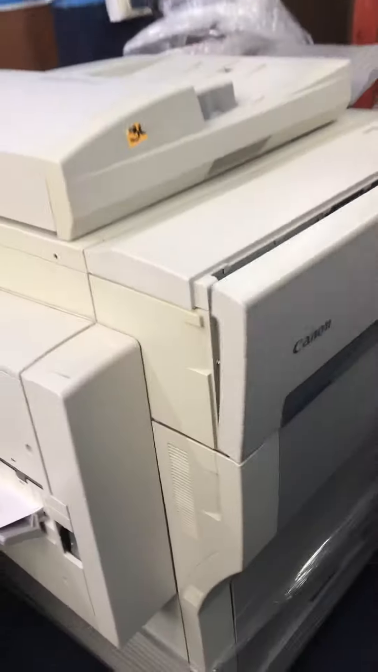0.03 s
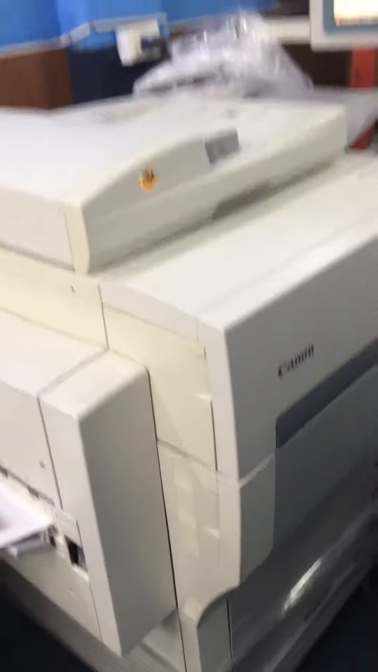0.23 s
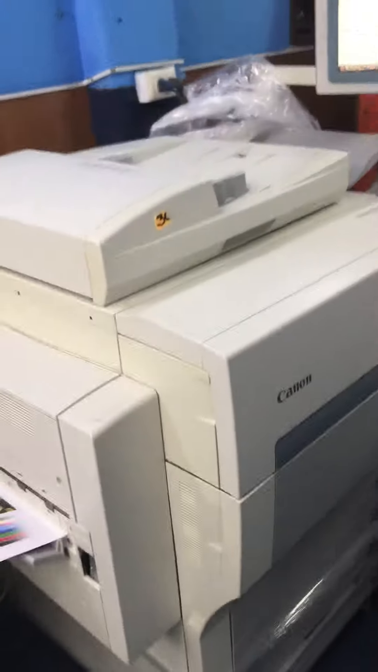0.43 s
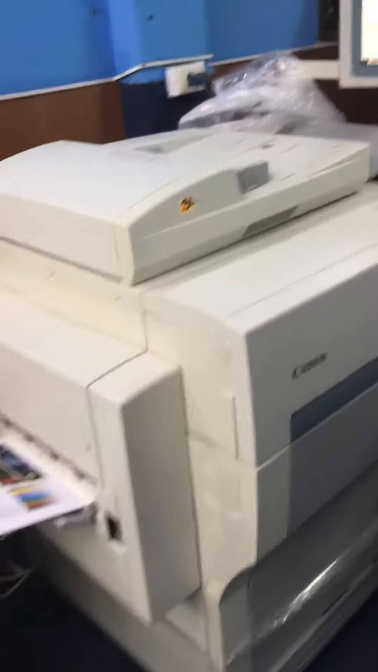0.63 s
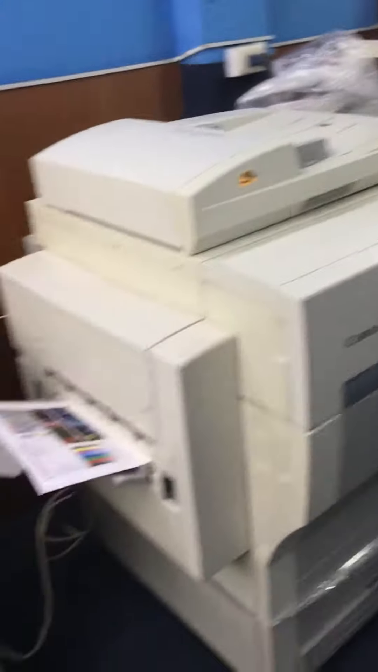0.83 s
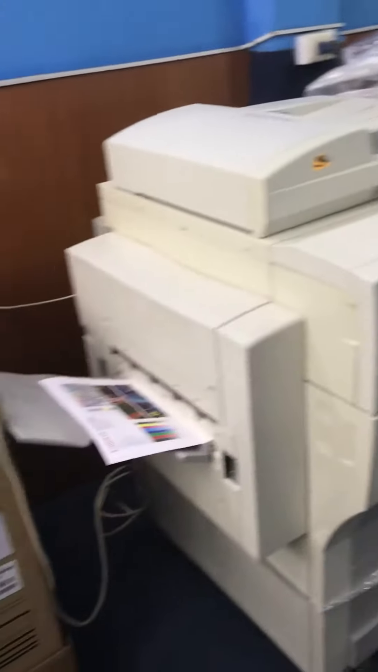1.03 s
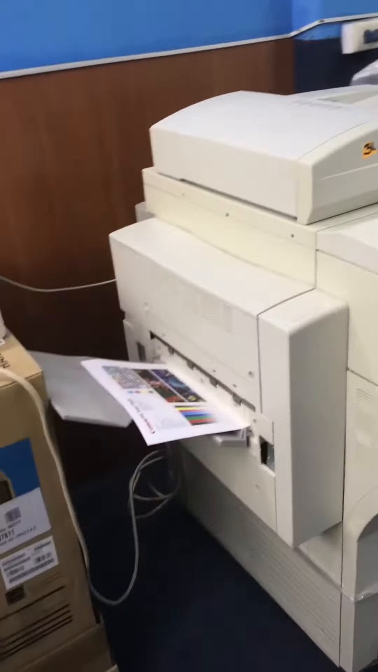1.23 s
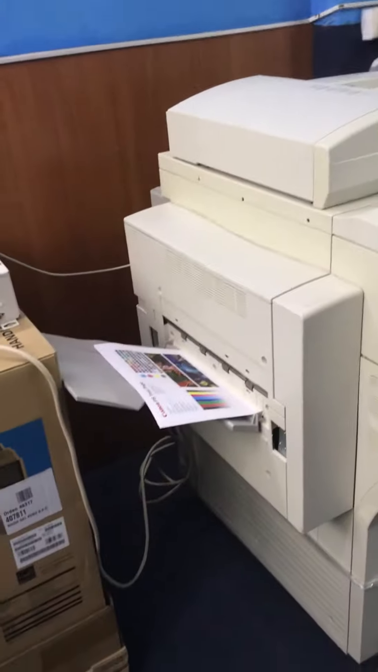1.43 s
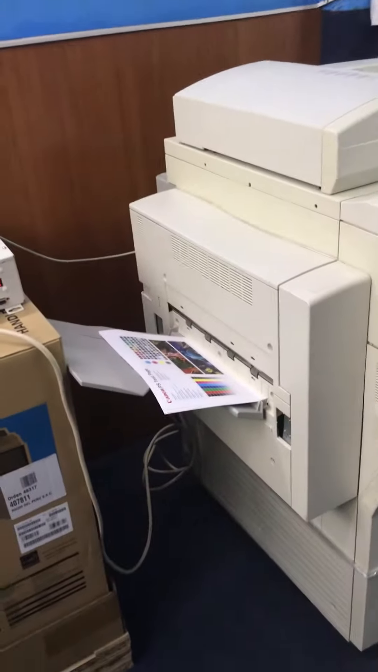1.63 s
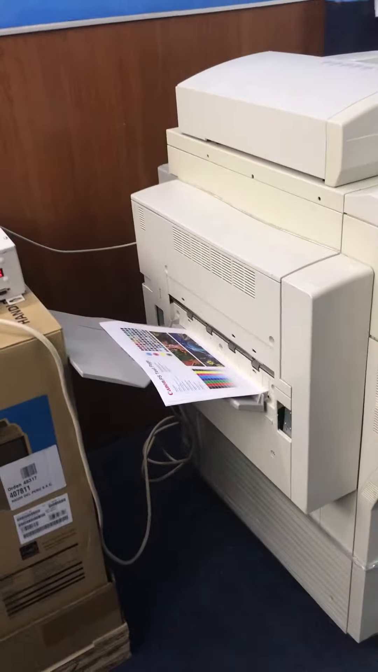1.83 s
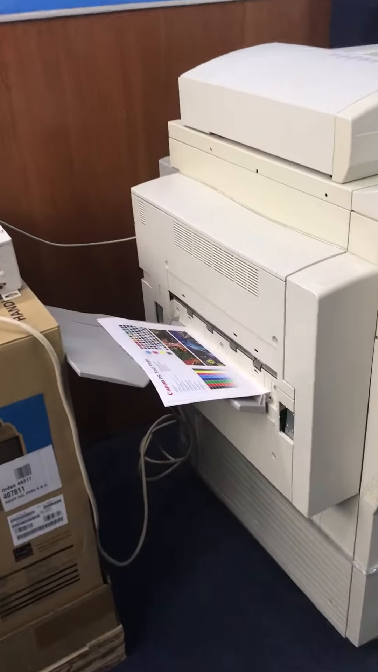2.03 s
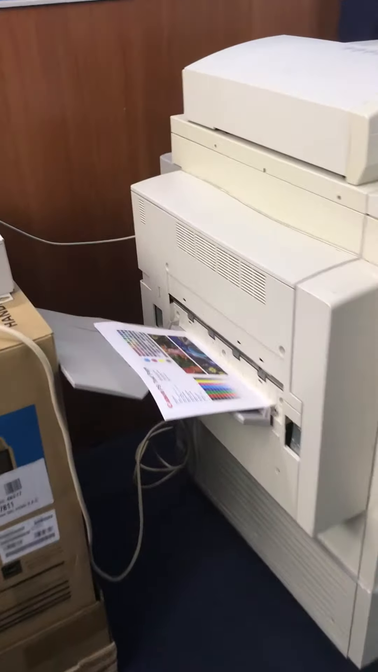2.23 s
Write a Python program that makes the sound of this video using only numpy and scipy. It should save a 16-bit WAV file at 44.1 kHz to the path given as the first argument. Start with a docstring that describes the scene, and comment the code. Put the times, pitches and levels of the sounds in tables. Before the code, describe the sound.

A large office printer runs throughout, a step or two from a handheld phone in a small room: soft fan and roller hiss, wavering low hum, thin steady motor whines shifting slightly around 0.9 s. A dull knock opens; at 0.25 s a hard double-edged latch clack hits the plastic cabinet with a short boom. Soft knocks and crisp clicks follow at 0.87-1.1 s, light ticks at 1.82 s.

```python
"""A small room, where a large office printer runs a step or two from a hand-held phone.
Fans and rollers hiss as shaped noise; a low hum wavers; motors and gears whine as steady sines.
A latch clacks hard into the plastic cabinet: noise bursts and pushes excite decaying modes.
Small parts tick, knock and ping as a sheet feeds out: short bursts through narrow resonances."""
import sys
import numpy as np
from scipy import signal
from scipy.fft import rfft, irfft
from scipy.io import wavfile
from scipy.ndimage import uniform_filter1d

SR = 44100
rng = np.random.default_rng(int(sys.argv[2]) if len(sys.argv) > 2 else 0)


def makeup_ratio(level_db):
    """Linear amplitude ratio for a level in decibels (20 dB per factor of ten)."""
    decades = np.asarray(level_db, float) / 20
    return 10 ** decades


def wav_record(signal):
    """Record a signal, one row per channel, as 16-bit PCM in the file named by sys.argv[1]."""
    frames = np.transpose(np.atleast_2d(signal))
    bounded = np.clip(frames, -1, 1)
    # unit amplitude maps onto the largest positive 16-bit level
    quanta = np.round(bounded * 32767).astype(np.int16)
    wavfile.write(sys.argv[1], SR, quanta)


N = 101430  # samples, 2.3 s

# Spectral shape of the fan and roller noise. Each row: frequency in Hz, relative density in dB per Hz.
AIR_SPECTRUM = [(15, -40), (25, -6), (70, -4), (114, -2.5), (229, -11), (476, -13), (641, -7), (818, -9),
                (1560, -14), (2480, -22.5), (2690, -19.5), (3820, -23), (7510, -27), (8360, -26.5),
                (16000, -36)]
# Broad cabinet resonances in the steady noise. Each row: centre in Hz, width in Hz, rms level in dB.
CABINET_HUMPS = [(218, 49, -63.5), (570, 96, -67.5), (3150, 100, -64), (5464, 360, -63.5), (8300, 250, -67)]
# Course of the low-mid rumble. Each row: time in seconds, relative level in dB.
RUMBLE_COURSE = [(0.45, -55), (0.572, -53.5), (1.356, -58.5), (2.0, -47.5), (2.01, -54), (2.3, -53.5)]
# Course of the wavering hum. Each row: time in seconds, pitch in Hz, rms level in dB.
HUM_COURSE = [(0.0, 60.6, -43), (0.12, 59.8, -50.5), (0.22, 59.7, -51), (0.27, 63, -42.5),
              (0.44, 62.2, -55.5), (0.66, 64.7, -49), (0.75, 64.0, -60), (0.81, 63, -48), (0.86, 63, -63),
              (0.91, 63.8, -45.5), (1.03, 63.7, -56.5), (1.23, 62, -45), (1.45, 62.8, -49),
              (1.5, 63.5, -55.5), (1.69, 63.4, -45), (1.77, 63.2, -45.5), (1.86, 62.2, -61),
              (1.94, 61, -51), (2.18, 61.5, -53), (2.2, 62.4, -57), (2.26, 63.6, -55), (2.3, 62, -55)]
# Multiples of the mirror motor's base pitch. Each row: multiple, mean level in dB before the phone has
# moved round to the outlet, mean level in dB after.
WHINE_MULTIPLES = [(11, -72, -65.5), (13, -70, -70), (14, -74, -73), (15, -72, -83), (16, -74, -84),
                   (18, -71, -72), (19, -73, -72), (21, -76, -74), (23, -74, -79), (24, -76, -80)]
# Gear and fan lines. Each row: frequency in Hz, mean level in dB before the move, mean level in dB after.
GEAR_LINES = [(232.4, -60.5, -61), (317.7, -67, -64.5), (556, -67, -67), (757, -70, -68), (926, -80, -68),
              (1368, -76, -68), (1540, -65.5, -70), (2665, -72, -69), (2700, -69, -71), (2725, -72, -69),
              (3190, -68, -73), (5450, -73, -75), (5550, -72, -76), (5620, -69, -76), (7190, -74, -78),
              (7940, -73, -76), (8630, -73, -76)]
# Six strong lines. Each entry: frequency in Hz.
STRONG_LINES_HZ = [636, 2634, 3084, 3160, 4481, 5377]
# Strong lines as the phone drifts through the room. Each row: time in seconds, mean level in dB of each line.
STRONG_COURSE = [(0, -56, -63, -70, -69, -72, -69), (.2, -55, -63, -70, -68, -74, -67),
                 (.55, -60, -67, -68, -63, -69, -70), (.7, -59, -68, -71, -66, -73, -68),
                 (.8, -58, -69, -69, -68, -63, -61), (.93, -58, -73, -70, -68, -72, -67),
                 (1.15, -57, -68, -72, -72, -72, -70), (1.3, -56, -60, -68, -60, -70, -70),
                 (1.5, -56, -64, -67, -65, -74, -71), (1.7, -56, -67, -63, -62, -76, -70),
                 (1.9, -56, -70, -66, -65, -69, -73), (2.08, -61, -70, -57, -69, -71, -69),
                 (2.2, -61, -65, -68, -72, -62, -71), (2.3, -60, -65, -65, -72, -68, -72)]
# Light ticks of small parts. Each row: start in seconds, relative level in dB, decay constant in seconds,
# share of the low resonances from 0 to 1.
TICKS = [(.703, -59, .003, .05), (0.973, -48, 0.0064, 0.38), (0.978, -50.5, 0.0043, 0.94),
         (0.981, -43.5, 0.0047, 0.44), (0.989, -48.5, 0.01, 0.47), (1.012, -58.5, 0.024, 0.7),
         (1.822, -47, 0.0027, 0.14), (1.827, -48, .008, 0.07), (1.84, -57, .008, 0.14),
         (1.849, -60, .01, 0.15), (1.864, -62, 0.0049, 0.22), (2.05, -67, 0.0028, .05)]
# High and low resonances of the small parts. Each row: centre in Hz, width in Hz, relative level in dB.
TICK_HIGH_MODES = [(12350, 320, 4.5), (13300, 1010, -9), (8590, 800, -2.5), (12000, 20000, -10)]
TICK_LOW_MODES = [(4260, 580, 6), (2500, 400, -1), (3350, 700, -2.5), (5550, 920, -1.5), (6920, 400, 0)]
# Dull knocks in the paper path. Each row: start in seconds, relative level in dB, centre in Hz.
KNOCKS = [(.001, -30, 243), (.008, -38, 540), (0.8645, -44, 1250), (0.868, -43, 1600), (0.870, -43, 480),
          (0.8835, -43, 600), (0.8835, -40, 1620)]
# One tiny metal part ringing alone. Each row: start in seconds, relative level in dB.
PINGS = [(1.02, -66), (1.041, -63), (1.089, -54)]
# Blows of the latch. Each row: start in seconds, relative snap level in dB, relative cabinet level in dB.
BLOWS = [(0.2222, -62, -30), (0.245, -16.5, -25), (0.2471, -19, -19.5), (0.2496, -28, -29),
         (0.2541, -30, -9.5), (0.2583, -42, -18), (0.261, -37, -23), (0.272, -52, -23), (0.283, -48, -21),
         (.289, -48, -28.5), (0.309, -51, -24.5)]
# Modes of the latch metal, all equally short. Each row: frequency in Hz, relative level in dB.
LATCH_MODES = [(7410, 4), (4380, -4), (8750, -1), (9580, 0.5), (11800, -5), (13100, -3), (14600, 3)]
# Modes of the cabinet, the high ones dying sooner. Each row: frequency in Hz, relative level in dB.
CABINET_MODES = [(170, -1), (238, -6), (280, -7), (350, -8), (420, -6), (585, -1), (702, -2), (740, -5),
                 (785, 7), (952, -3), (1180, -3), (1290, -4), (1470, -6), (1800, -2), (2050, -5),
                 (2205, -5), (2600, -11), (3200, -9.5), (3510, -12), (4500, -10)]
# Reverberation of the room. Each row: frequency in Hz, time to fall by 60 dB in seconds.
ROOM_T60 = [(80, 0.19), (300, 0.56), (1000, 0.42), (3000, 0.46), (8000, 0.39), (15000, 0.19)]

AIR_DB, AIR_SWELL_DB, AIR_FLICKER_DB = -50, 2.55, 1.5  # rms level; spread shared by all bands, spread of each
WHINE_HZ, LINE_DRIFT = 448.1, .0004  # base pitch; relative spread of pitch
LINE_WANDER_DB, LINE_FLUTTER_DB = 1.8, 3.4  # slow and fast spread in level, before the share of each line
STEADY_BELOW_HZ, STRONG_UNREST = 1460, .6  # lines below are steadier; share of unrest in the strong lines
MOVE_S, MOVE_LENGTH_S = 0.94, 0.27  # middle and length of the phone's move
KNOCK_WIDTH_HZ, KNOCK_S = 420, .0013
PING_HZ, PING_WIDTH_HZ, PING_S = 12650, 230, 0.0026
SNAP_S, THUD_S, RISE_S = .0022, 0.0063, 0.00018  # time constants: fall of snap and thud, rise of all bursts
SNAP_HISS_DB, THUD_HISS_DB = 4.5, 4.5  # gains of the bursts heard directly
PUSH_DB, PUSH_S = 14, 0.000087  # gain and time constant of the push on the cabinet
LATCH_T60_S, CABINET_T60_S, CABINET_CYCLES = .012, .08, 30  # cabinet t60: the shorter of .08 s and 30 cycles
BOOM_S, BOOM_HZ, BOOM_DB, BOOM_RISE_S = .258, 75, -32.5, 0.011  # dB of the envelope's peak
HIT_LOW_HZ = 165
ROOM_DB, ROOM_GAP_S = -8, 0.0013  # tail gain; ramp at the start of the tail
MIC_LOW_HZ, MIC_TOP_HZ = 20, 16000


def level(x, db):
    """Normalization: the signal is scaled to a given rms level."""
    return x * makeup_ratio(db) / np.sqrt(np.mean(x ** 2))


def curve(rows, axis=1):
    """Linear interpolation in time of one table column."""
    rows = np.array(rows)
    return np.interp(np.arange(N) / SR, rows[:, 0], rows[:, axis])


def on_log(rows, hz):
    """Linear interpolation of a table over log frequency."""
    rows = np.array(rows, float)
    return np.interp(np.log(hz), np.log(rows[:, 0]), rows[:, 1])


def band(x, hz, width):
    """Simple resonator: a two-pole band-pass of unit gain at its centre."""
    return signal.lfilter(*signal.iirpeak(min(hz, .45 * SR), hz / width, fs=SR), x)


def walk(rate):
    """Slow random modulation: values held for 1 / rate seconds and smoothed twice, spread near 1."""
    hold = int(SR / rate)
    steps = np.repeat(rng.standard_normal(N // hold + 1), hold)
    return 1.143 * uniform_filter1d(uniform_filter1d(steps, hold), hold)[:N]


def ring(x, modes):
    """Modal superposition: x excites decaying modes, neighbours in opposite phase."""
    out = 0
    for k, (hz, db, t60) in enumerate(modes):
        radius = np.exp(-np.log(1000) / (t60 * SR))
        angle = 2 * np.pi * hz / SR
        numerator = [0, radius * np.sin(angle)]
        denominator = [1, -2 * radius * np.cos(angle), radius ** 2]
        out = out + (-1) ** k * makeup_ratio(db) * signal.lfilter(numerator, denominator, x + 1e-18)
    return out


def bursts(times, dbs, fall_s):
    """Impact noise: random pressure under a quick rise and an exponential fall."""
    envelope = np.full(N, 1e-18)
    np.add.at(envelope, (np.asarray(times) * SR).astype(int), makeup_ratio(dbs))
    for constant_s in (fall_s, RISE_S):
        envelope = signal.lfilter([1], [1, -np.exp(-1 / (constant_s * SR))], envelope)
    return envelope / (RISE_S * SR) * rng.standard_normal(N)


def air():
    """Broadband flow noise: half-octave bands swell together and flicker alone, plus humps and rumble."""
    f = np.fft.rfftfreq(N, 1 / SR)
    spectrum = rfft(rng.standard_normal(N)) * makeup_ratio(on_log(AIR_SPECTRUM, f + 1))
    swell = walk(0.5)
    hiss = 0
    for octave in np.arange(4, 14.5, .5):  # band centre as a power of two in Hz
        share = np.clip(1 - np.abs(np.log2(f + 1) - octave) / .5, 0, 1)
        gain_db = AIR_SWELL_DB * swell + AIR_FLICKER_DB * walk(13.87)
        hiss = hiss + irfft(spectrum * share, N) * makeup_ratio(gain_db)
    humps = sum(level(band(rng.standard_normal(N), hz, width), db) for hz, width, db in CABINET_HUMPS)
    low_mid = band(band(rng.standard_normal(N), 262, 300), 262, 300)
    rumble = level(low_mid, -4.5) * makeup_ratio(curve(RUMBLE_COURSE))
    return level(hiss, AIR_DB) + humps + rumble


def tone(hz, before_db, after_db, share=1):
    """Pure tone whose level shifts as the phone moves; high lines wander and flutter more."""
    moved = np.clip((np.arange(N) / SR - MOVE_S) / MOVE_LENGTH_S + .5, 0, 1)
    phase = 2 * np.pi * (np.cumsum(hz * np.ones(N)) / SR + rng.random())
    depth = share * min(np.mean(hz) / STEADY_BELOW_HZ, 1) ** .5
    unrest_db = depth * (LINE_WANDER_DB * walk(3.3) + LINE_FLUTTER_DB * walk(17))
    return np.sqrt(2) * np.sin(phase) * makeup_ratio(before_db + (after_db - before_db) * moved + unrest_db)


def drifting(hz, rate=3.55):
    """Frequency drift: a nominal pitch varies slowly and randomly."""
    return hz * (1 + LINE_DRIFT * walk(rate))


def motors():
    """Rotating machinery: hum, whine multiples of one shaft speed, separate gear lines and strong lines."""
    hum_phase = 2 * np.pi * np.cumsum(curve(HUM_COURSE)) / SR
    hum = np.sqrt(2) * np.sin(hum_phase) * makeup_ratio(curve(HUM_COURSE, axis=2))
    shaft = drifting(WHINE_HZ, 1.97)
    whine = sum(tone(multiple * shaft, before, after) for multiple, before, after in WHINE_MULTIPLES)
    gears = sum(tone(drifting(hz), before, after) for hz, before, after in GEAR_LINES)
    strong = sum(tone(drifting(hz), 0, 0, STRONG_UNREST) * makeup_ratio(curve(STRONG_COURSE, axis=k + 1))
                 for k, hz in enumerate(STRONG_LINES_HZ))
    return hum + whine + gears + strong


def ticks():
    """Impact on small parts: each burst is shared between high and low resonances."""
    high, low = 0, 0
    for start, db, fall_s, low_share in TICKS:
        shake = bursts([start], [db], fall_s)
        low_share = np.clip(low_share, 0, 1)
        high = high + shake * (1 - low_share)
        low = low + shake * low_share
    bright = sum(makeup_ratio(db + 12.5) * band(high, hz, width) for hz, width, db in TICK_HIGH_MODES)
    dark = sum(makeup_ratio(db + 14) * band(low, hz, width) for hz, width, db in TICK_LOW_MODES)
    return bright + dark


def knocks():
    """Damped resonance: short bursts pass two resonators in cascade, the second twice as wide."""
    out = 0
    for start, db, hz in KNOCKS:
        narrow = band(bursts([start], [db + 20.5], KNOCK_S), hz, KNOCK_WIDTH_HZ)
        out = out + band(narrow, hz, 2 * KNOCK_WIDTH_HZ)
    return out


def pings():
    """Selective resonance: short bursts make a tiny metal part ring on one high note."""
    start, db = np.array(PINGS).T
    narrow = band(bursts(start, db, PING_S), PING_HZ, PING_WIDTH_HZ)
    return makeup_ratio(21) * band(narrow, PING_HZ, 4 * PING_WIDTH_HZ)


def boom():
    """Whole-body oscillation: the cabinet booms once after the clack, swelling and dying away."""
    t = np.clip(np.arange(N) / SR - BOOM_S, 0, None)
    envelope = t / BOOM_RISE_S * np.exp(1 - t / BOOM_RISE_S)
    return makeup_ratio(BOOM_DB) * envelope * np.sin(2 * np.pi * BOOM_HZ * t)


def latch():
    """Impact excitation: each blow snaps the metal and pushes the cabinet; returns metal ring and crash."""
    start, snap_db, body_db = np.array(BLOWS).T
    snap = bursts(start, snap_db, SNAP_S)
    thud = bursts(start, body_db, THUD_S)
    push = np.full(N, 1e-18)
    push[(start * SR).astype(int)] = makeup_ratio(body_db + PUSH_DB)
    fade = np.exp(-1 / (PUSH_S * SR))
    push = signal.lfilter([1 - fade], [1, -fade], push)

    metal = ring(snap, [(hz, db, LATCH_T60_S) for hz, db in LATCH_MODES])
    box_modes = [(hz, db, min(CABINET_T60_S, CABINET_CYCLES / hz)) for hz, db in CABINET_MODES]
    box = ring(push + makeup_ratio(-8.5) * thud, box_modes)
    snap_hiss = makeup_ratio(SNAP_HISS_DB) * band(snap, 13000, 10700)
    thud_hiss = makeup_ratio(THUD_HISS_DB) * band(band(thud, 1050, 2000), 1000, 4600)
    return makeup_ratio(-19.5) * band(metal, 11400, 14700), snap_hiss + makeup_ratio(-24.5) * box + thud_hiss


def room(x):
    """Diffuse reverberation: convolution with noise whose bands decay at their own rates."""
    t = np.arange(SR // 2) / SR
    tail = 0
    for hz in 60 * 2 ** np.arange(0, 8.1, .5):
        noise = band(band(rng.standard_normal(len(t)), hz, hz / 2), hz, hz / 2)
        tail = tail + np.sqrt(1 / 2) * noise * makeup_ratio(-60 * t / on_log(ROOM_T60, hz))
    tail = tail * np.clip(t / ROOM_GAP_S, 0, 1)
    return signal.fftconvolve(x, tail / np.sqrt(np.sum(tail ** 2)))[:N]


def scene():
    """Direct and reverberant field: steady machine and impacts; metal ring and boom have no room tail."""
    metal, crash = latch()
    high_pass = signal.butter(3, HIT_LOW_HZ, "high", fs=SR, output="sos")
    hits = signal.sosfilt(high_pass, crash + ticks() + knocks() + pings())
    return (air() + motors() + metal + boom() + hits + makeup_ratio(ROOM_DB) * room(hits))[None]


def top_cut(x):
    """Nothing passes above the cut-off."""
    return signal.sosfilt(signal.butter(12, 17100, fs=SR, output="sos"), x)


def record(dry):
    """Band limitation: the phone cuts the deepest bass and the top."""
    low_pass = signal.ellip(10, .2, 70, MIC_TOP_HZ, fs=SR, output="sos")
    high_pass = signal.butter(1, MIC_LOW_HZ, "high", fs=SR, output="sos")
    mix = signal.sosfilt(high_pass, signal.sosfilt(low_pass, dry))
    return top_cut(mix)


dry = scene()
out = record(dry)
wav_record(out)
```